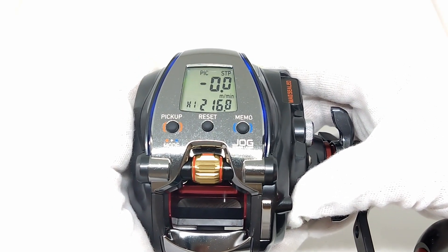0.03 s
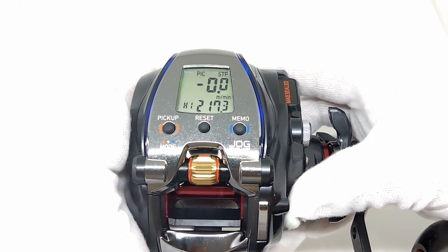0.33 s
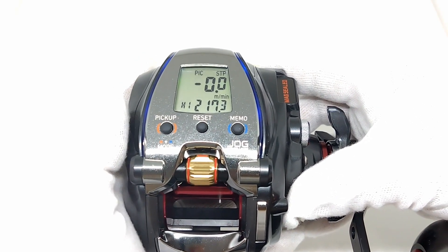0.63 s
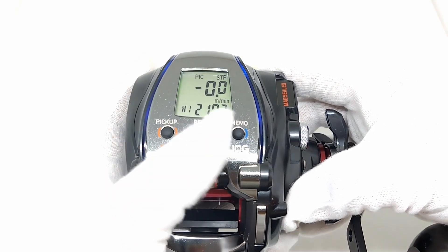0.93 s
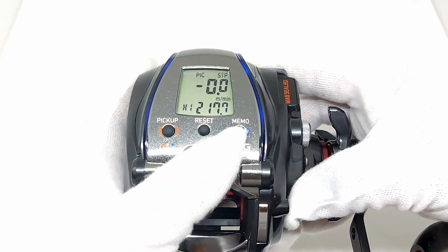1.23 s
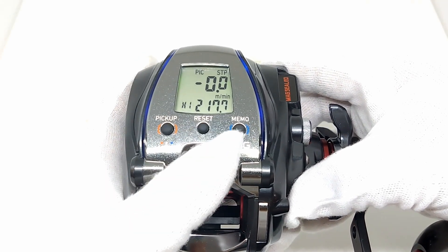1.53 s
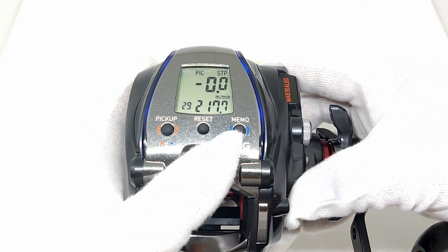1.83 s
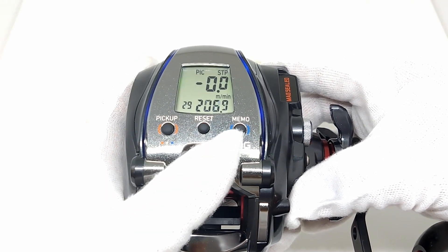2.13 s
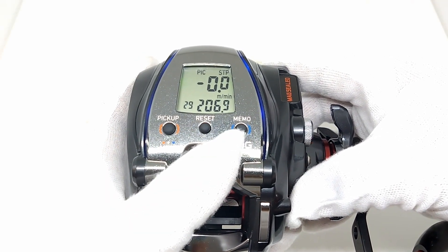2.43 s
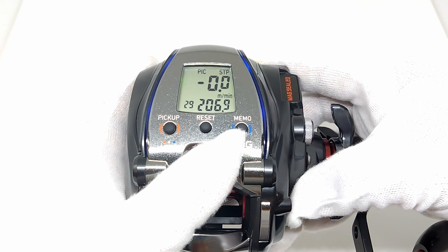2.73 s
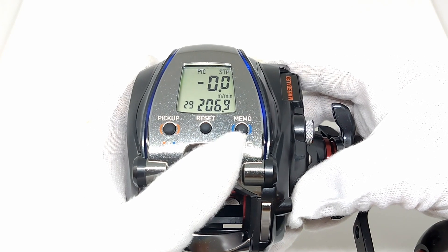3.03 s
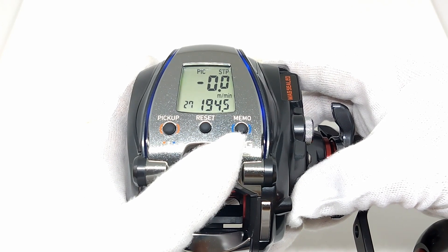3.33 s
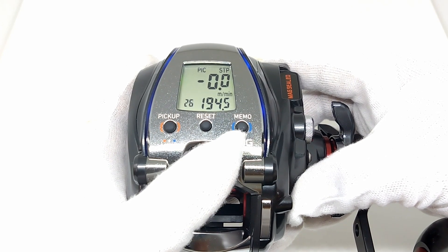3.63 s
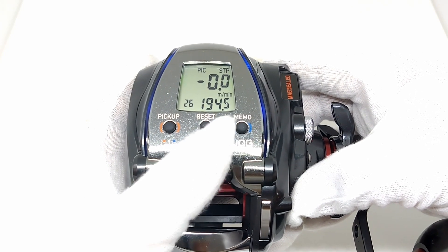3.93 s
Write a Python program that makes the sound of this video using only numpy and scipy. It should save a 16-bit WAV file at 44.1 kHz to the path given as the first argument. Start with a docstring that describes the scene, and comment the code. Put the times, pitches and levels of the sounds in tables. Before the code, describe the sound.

An electric fishing reel motor runs throughout, very close, with a high whine and a bright hiss of gears. At about 1.4 seconds the pitch steps down and holds. From 2.8 to 3.6 seconds it sinks again in small steps, with a barely audible thumb bump on the case near 2.9 seconds. It keeps running slower until 4 seconds, with a fine, rapid ticking buzz.

```python
"""Electric fishing reel, close up

A reel winds in right at a two-port stereo microphone, stepped down from fast to medium to slow.
The motor whines on multiples of its rotation rate; its brushes and gears hiss through the resonances
of the housing, ticking on every turn at the lower speeds. A gloved thumb bumps the case softly."""
import sys
import numpy as np
from scipy import signal
from scipy.fft import rfft, irfft
from scipy.io import wavfile
from scipy.ndimage import map_coordinates

SR = 44100
rng = np.random.default_rng(int(sys.argv[2]) if len(sys.argv) > 2 else 0)


def to_wav(s):
    """Save 16-bit WAV."""
    ch = np.atleast_2d(s).T  # columns
    pcm = np.round(np.clip(ch, -1, 1) * 32767)  # PCM
    wavfile.write(sys.argv[1], SR, pcm.astype(np.int16))


N = 176400
TIME, FREQS = np.arange(N) / SR, np.maximum(np.arange(N // 2 + 1) * SR / N, 1)


# rotation rate of the motor: t/s, f/Hz
MOTOR_SPEED = [(0.0, 542.4), (0.5, 541.8), (1.32, 541.2), (1.36, 542.4), (1.41, 520.6), (1.5, 500.6),
               (1.56, 489.4), (1.73, 486.3), (2.53, 484.4), (2.8, 486), (2.86, 469.5), (3.0, 463),
               (3.1, 448.2), (3.16, 443.6), (3.35, 441.3), (3.43, 428), (3.61, 422.4), (3.99, 422.8)]
def motor(waver_share=0.00072):
    """Speed in Hz and shaft angle in radians; the shaft wavers slightly about the set speed."""
    speed = in_time(MOTOR_SPEED)[0]
    wavering = speed * (1 + waver_share * drift(25.9))
    return speed, 2 * np.pi * np.cumsum(wavering) / SR


# numbered partials, swelling and fading as they meet resonances: t/s, left level/dB, right level/dB
WHINE_1 = [(0.0, -42, -42), (0.04, -45, -45.5), (1.34, -43.5, -42.5), (1.64, -37, -46), (2.8, -37.5, -48),
           (2.94, -48, -75), (3.98, -67, -59)]
WHINE_3 = [(0, -25, -32), (.6, -25, -32), (.7, -29.5, -30), (1.35, -29, -28), (1.4, -22, -38),
           (1.5, -19.5, -27), (1.65, -23, -23), (2.8, -23.5, -23.5), (2.87, -32.5, -25), (3.01, -25, -27),
           (3.07, -25, -31), (3.33, -24, -29), (3.48, -31, -39), (3.65, -38, -32.5), (4, -31, -28.5)]
WHINE_6 = [(0.0, -37.5, -48.5), (1.4, -36, -30), (1.44, -32, -36), (1.52, -20.5, -22.5),
           (2.78, -22.5, -25.5), (2.84, -29, -33), (3.18, -39, -42), (3.4, -33, -32.5), (3.98, -29, -28.5)]
WHINE_7 = [(0.0, -30, -43), (0.3, -27.5, -43), (1.34, -30, -45), (1.66, -39, -30), (2.4, -33, -32),
           (3.38, -37, -37), (3.44, -35, -33), (3.98, -33, -36)]
WHINE_8 = [(0.0, -67, -35.5), (1.46, -28.5, -55), (1.64, -20.0, -48), (2.82, -23.5, -44),
           (2.98, -20.5, -25), (3.04, -29.5, -29), (3.98, -28, -33)]
WHINE_9 = [(0.0, -35, -32), (0.3, -30.5, -42.5), (3.06, -34, -29), (3.22, -26.5, -26.5), (3.52, -23, -54),
           (3.98, -28.5, -66)]
WHINES = {1: WHINE_1, 3: WHINE_3, 6: WHINE_6, 7: WHINE_7, 8: WHINE_8, 9: WHINE_9}
def motor_whine(speed, angle, trim_db=-0.5, flutter_db=1.38):
    """The motor's strong partials; all but the lowest sway with the gear wheels."""
    sway_db = wheel_sway(angle)
    whine = np.zeros((2, N))
    for order, curve in WHINES.items():
        level_db = in_time(curve) + trim_db + sway_db * (order > 1) + flutter_db * drift(17)
        whine += partial(order, speed, angle, level_db, jitter_rad=0.012)
    return whine


# weaker motor partials and gear tones: multiples of the rotation rate
WEAK_ORDERS = [2, 4, 5, 5.42, 6.42, 8.42, 10, 11, 12, 14, 15.78, 16.32, 16.84, 18, 21, 30]
# a row for each: slow level/dB, medium level/dB, fast level/dB, left minus right/dB
WEAK_LEVELS = [(-66, -51, -45.5, 9), (-51, -42.5, -44, 7), (-55, -47.5, -61, 14), (-57, -48, -38.5, 5),
               (-38.5, -44.5, -60, 9), (-36, -47, -44.5, 5), (-50, -36.5, -39.5, -5), (-35, -40, -41.5, -1),
               (-38.5, -39, -46.5, 6), (-40, -66, -52, -2), (-65, -71, -41.5, 6), (-67, -36.5, -45.5, 0),
               (-57, -46.5, -40, 13), (-60, -46, -39, 12), (-48, -44, -52, 12), (-56, -48, -62, 8)]
# the slow, medium and fast steps: f/Hz
STEP_HZ = [422, 485.5, 541.6]
def weak_tones(speed, angle, flutter_db=2.5, slowing_hz_per_s=200):
    """Motor and gear tones whose levels follow the speed step; they roughen while the motor slows."""
    slowing = np.tanh(np.abs(np.gradient(speed)) * SR / slowing_hz_per_s)
    jitter_rad = 0.018 + 0.056 * slowing
    tones = np.zeros((2, N))
    for order, (*steps_db, pan_db) in zip(WEAK_ORDERS, WEAK_LEVELS):
        level_db = np.interp(speed, STEP_HZ, steps_db) + flutter_db * drift(20)
        tones += partial(order, speed, angle, level_db + pan_db * np.array([[.5], [-.5]]), jitter_rad)
    return tones


# the reel at the microphone's two ports: f/Hz, likeness/0-1, left phase lead/rad
PORTS = [(206, 0.23, 4), (694, 1, -0.8), (1036, 0.5, 0.57), (1290, 0.22, 3), (1350, 0.7, 1.5),
         (1417, 0.3, 1.5), (1414, 0, 3), (1476, 0.1, 3), (1618, 0.75, 2.5), (1890, 0.4, 4.5), (2430, 1, 2),
         (3016, 0.53, 1.0), (3330, 0, 2), (3820, 0, 0.96), (3710, 0.5, -0.65), (4134, 0.84, 3),
         (5400, 0.12, 0.77), (6200, 0.57, 2), (8350, 0.67, 1.8), (8920, 0, -0.5), (14900, 0.6, -2.5)]
def partial(order, speed, angle, level_db, jitter_rad, wobble_rad=0.3, scatter_rad=0.55):
    """One multiple of the rotation, flickering a little differently at each port."""
    lead = at_hz(PORTS, order * speed)[1] + wobble_rad * drift(16)
    phase = order * (angle + jitter_rad * drift(40)) + scatter_rad * rng.standard_normal()
    flicker_db = 0.58 * np.array([drift(35), drift(27)])
    return np.sqrt(2) * from_db(level_db + flicker_db) * np.cos([phase, phase - lead])


# hiss of brushes and gears as the housing radiates it: f/Hz, left level/dB, right level/dB
HOUSING = [(30.0, -128.0, -128.0), (190.0, -120.0, -120.0), (300.0, -85.0, -86.0), (520.0, -81.0, -85.0),
           (600.0, -84.0, -86.0), (860.0, -78.0, -78.0), (950.0, -66.0, -69.0), (1080.0, -61.0, -70.0),
           (1160.0, -76.0, -74.0), (1420.0, -69.0, -70.0), (1640.0, -72.0, -75.0), (1810.0, -67.0, -67.0),
           (2370.0, -60.0, -72.0), (2540.0, -61.0, -63.0), (2780, -60, -62), (2930, -55, -58),
           (3060, -64, -65), (3280, -58, -60), (3700, -58, -60), (3930, -54, -60), (4180.0, -62.0, -63.0),
           (4570.0, -60.0, -60.0), (4780.0, -66.0, -67.0), (4870.0, -59.0, -60.0), (5150, -61, -63),
           (5600.0, -70.0, -69.0), (5900.0, -65.0, -65.0), (6370.0, -70.0, -70.0), (6500.0, -64.0, -66.0),
           (6980.0, -71.0, -70.0), (7240.0, -64.0, -65.0), (7620.0, -68.0, -69.0), (7920.0, -63.0, -62.0),
           (8050.0, -70.0, -69.0), (8180.0, -58.0, -57.0), (8310.0, -65.0, -64.0), (8560, -57, -59),
           (8680, -59, -60), (8840, -52, -56), (9100, -56, -62), (9520.0, -56.0, -80.0),
           (9910.0, -60.0, -76.0), (10120.0, -71.0, -79.0), (10290.0, -62.0, -77.0),
           (11200.0, -68.0, -76.0), (11540.0, -63.0, -80.0), (11710.0, -69.0, -73.0),
           (13180.0, -61.0, -75.0), (14080.0, -69.0, -72.0), (14640.0, -62.0, -73.0),
           (15680.0, -66.0, -77.0)]
def housing(sources, trim_db=-0.5, ripple_db=3.5, mode_phase_rad=2.24, modes_hz=2890):
    """Each noise pair's spectra at the microphone, through broad resonances with narrow ones on top."""
    alike, lead = at_hz(PORTS, FREQS)
    modal = np.minimum(FREQS / modes_hz, 1)
    # each mode reaches the ports differently
    lead += mode_phase_rad * across_hz(width_hz=106) * modal ** 2
    ripple = rms_one(from_db(ripple_db * across_hz(width_hz=14) * modal))
    response = from_db(at_hz(HOUSING, FREQS) + trim_db) * ripple * np.sqrt(SR / 2)
    spectra = []
    for common, separate in map(rfft, sources):
        left = common * np.exp(1j * lead)
        right = alike * common + np.sqrt(1 - alike ** 2) * separate
        spectra.append(np.array([left, right]) * response)
    return spectra


# rise and fall of the hiss: t/s, bass level/dB, middle level/dB, treble level/dB
HISS_LEVELS = [(0, 1.5, 1.8, 1.5), (1.3, 1.5, 1.5, 2.5), (1.52, 1.5, 2, 1.3), (1.8, -0.5, -1, -0.3),
               (2.75, -0.5, -2.2, 0.4), (2.95, 1, 0.5, 0), (3.12, -0.5, -1, 0.6), (3.5, 0.5, -2.2, -0.8),
               (4, -0.5, -1, -0.9)]
# start and end of the bass-middle crossover, then of the middle-treble one: f/Hz
CROSSOVER_HZ = [1490, 2840, 5740, 8200]
def hiss(angle, tooth_share=0.45, flutter_db=0.5):
    """Friction noise through the housing, swayed by the wheels; its middle range buzzes and ticks."""
    friction = rng.standard_normal((2, N))
    buzz = np.sqrt(tooth_share) * gear_teeth(angle) + np.sqrt(1 - tooth_share) * rubbing(angle)
    friction_spectrum, buzz_spectrum = housing([friction, buzz])
    bass = band(friction_spectrum, [1, 0, 0, 0])
    middle = band(buzz_spectrum, [0, 1, 1, 0]) * brush_ticks(angle)
    treble = band(friction_spectrum, [0, 0, 0, 1])
    return sum(part * from_db(db + wheel_sway(angle) + flutter_db * drift(14))
               for part, db in zip((bass, middle, treble), in_time(HISS_LEVELS)))


# three unequal ticks of a turn: position/turns, relative strength
TICKS = [(0, 0.73), (.39, 0.59), (.66, .35)]
# how deeply they pulse the hiss: t/s, depth/0-1
TICK_DEPTH = [(0, 0.02), (1.45, 0.01), (1.7, 0.05), (2.8, 0.35), (3.1, 0.1), (3.4, 0.25), (3.6, 0.64),
              (4, 0.62)]
def brush_ticks(angle, sharpness=4.06):
    """Gain that pulses as the brushes tick on every turn."""
    ticks = sum(size * np.exp(sharpness * (np.cos(angle - 2 * np.pi * turn) - 1)) for turn, size in TICKS)
    depth = in_time(TICK_DEPTH)[0]
    return np.sqrt(1 - depth + depth * rms_one(ticks) ** 2)


def gear_teeth(angle, cycle_turns=57, grains_per_turn=90):
    """The same teeth meet again after a full cycle of the gears: a dense buzz that follows the speed."""
    surface = rng.standard_normal((2, cycle_turns * grains_per_turn))
    place = angle / (2 * np.pi) * grains_per_turn
    return rms_one(np.array([map_coordinates(row, [place], order=3, mode="grid-wrap") for row in surface]))


def rubbing(angle, memory=0.45):
    """The same rough surfaces meet on every turn, so the noise gathers around the partials."""
    noise = rng.standard_normal((2, N))
    repeats = np.zeros((2, N))
    for turns in range(4):
        earlier = np.interp(angle - 2 * np.pi * turns, angle, np.arange(N)).round().astype(int)
        repeats += memory ** turns * noise[:, earlier]
    return repeats * np.sqrt(1 - memory ** 2)


# gear wheels: turns per motor turn
WHEEL_RATIOS = [.0058, .0527, .0701, .175, .525]
# swing of each: rms level/dB
WHEEL_DB = [0.17, 0.48, 0.43, 0.082, 0.34]
def wheel_sway(angle):
    """Level swing in dB from the gear wheels, each once per turn of its own."""
    return sum(db * np.sqrt(2) * np.sin(ratio * angle + rng.uniform(0, 2 * np.pi) + drift(2.3))
               for ratio, db in zip(WHEEL_RATIOS, WHEEL_DB))


# thumb on the case, close to the microphone: t/s, relative level/dB
BUMPS = [(2.861, -48), (2.909, -43)]
# dull ring of the case: f/Hz, relative level/dB, t60/s
CASE_MODES = [(120, -20, .07), (210, -17, 0.094), (342, 7.5, 0.08)]
def thumb_bumps(band_hz=(127, 401)):
    """Soft pushes of a gloved thumb ring the case, alike at both ports."""
    pushes = np.zeros(N)
    for s, db in BUMPS:
        pushes[int(s * SR)] = from_db(db)
    ring = sum(from_db(db - 60 * TIME / t60) * np.sin(2 * np.pi * hz * TIME) for hz, db, t60 in CASE_MODES)
    soften = signal.butter(2, band_hz, "band", fs=SR, output="sos")
    return signal.sosfilt(soften, signal.fftconvolve(pushes, ring)[:N])


def glove_rumble(level_db=-102, swing_db=2, cutoff_hz=100):
    """Gloves on the case rumble very faintly under the reel."""
    lowpass = signal.butter(2, cutoff_hz, fs=SR, output="sos")
    rumble = rms_one(signal.sosfilt(lowpass, rng.standard_normal((2, N))))
    return rumble * from_db(level_db + swing_db * np.minimum(drift(8), 2))


def band(spectrum, shares):
    """One range of a spectrum as sound, given its power shares at the crossover edges."""
    return irfft(spectrum * np.sqrt(np.interp(FREQS, CROSSOVER_HZ, shares)), N)


def from_db(db):
    """Decibels to gain."""
    return 10 ** (np.asarray(db) / 20)


def rms_one(x):
    """Scale to unit power."""
    return x / np.sqrt(np.mean(x ** 2) + 1e-20)


def in_time(rows):
    """The columns of a curve at every sample."""
    s, *columns = np.transpose(rows)
    return np.array([np.interp(TIME, s, c) for c in columns])


def at_hz(rows, hz):
    """The columns of a spectrum at the given frequencies."""
    f, *columns = np.transpose(rows)
    return np.array([np.interp(np.log(hz), np.log(f), c) for c in columns])


def drift(rate_hz):
    """Slow random motion of spread 1."""
    return rms_one(irfft(rfft(rng.standard_normal(N)) / (1 + (FREQS / rate_hz) ** 2), N))


def across_hz(width_hz):
    """Random unevenness along the spectrum, of spread 1."""
    return drift(SR ** 2 / (2 * np.pi * N * width_hz))[:len(FREQS)]


def scene():
    """The reel in hand at close range: one rotation drives both the whine and the hiss."""
    speed, angle = motor()
    reel = motor_whine(speed, angle) + weak_tones(speed, angle) + hiss(angle)
    return reel + thumb_bumps() + glove_rumble()


def record(dry):
    """Both microphone channels are cut steeply above 16 kHz."""
    return signal.sosfilt(signal.ellip(12, .1, 80, 16000, fs=SR, output="sos"), dry)


dry = scene()
out = record(dry)
to_wav(out)
```